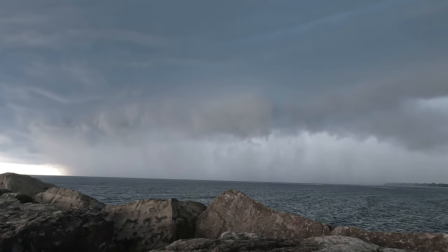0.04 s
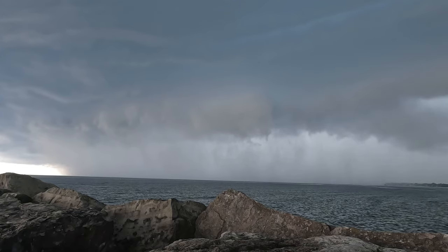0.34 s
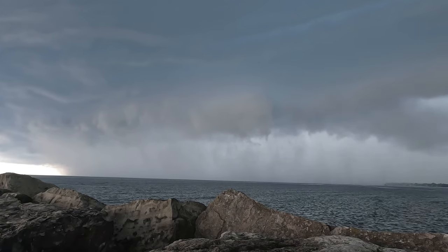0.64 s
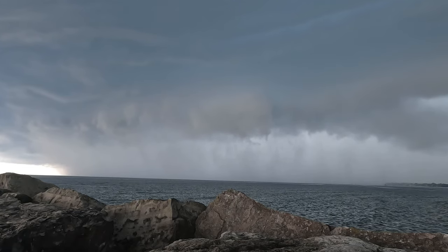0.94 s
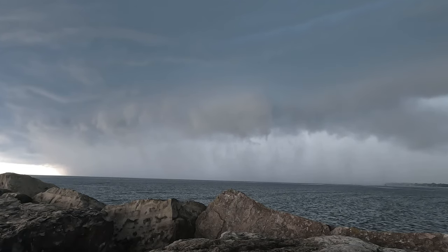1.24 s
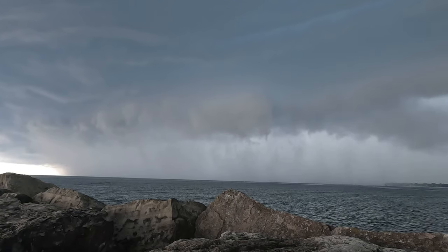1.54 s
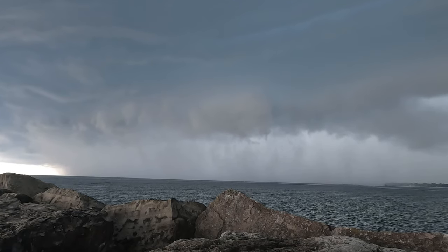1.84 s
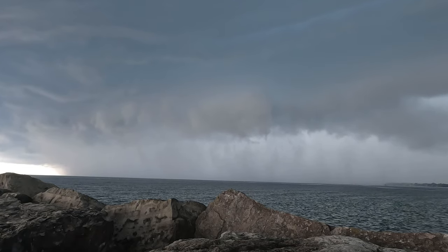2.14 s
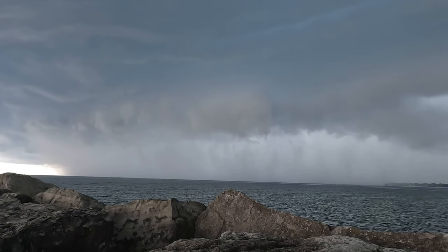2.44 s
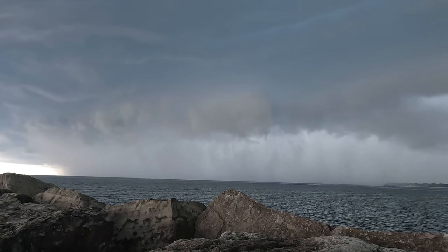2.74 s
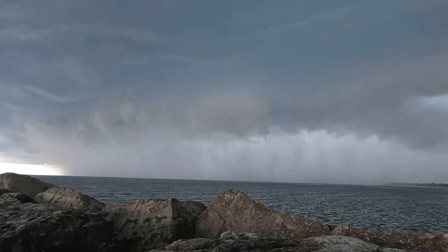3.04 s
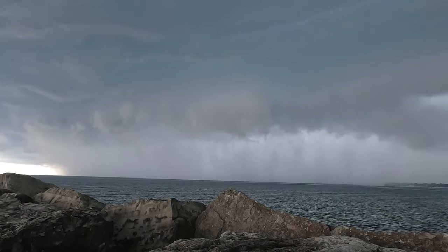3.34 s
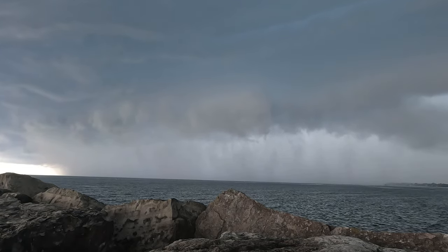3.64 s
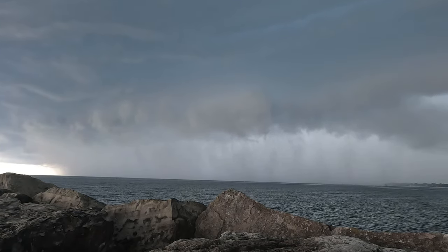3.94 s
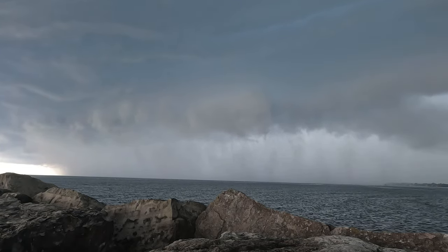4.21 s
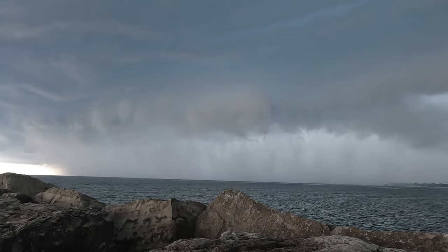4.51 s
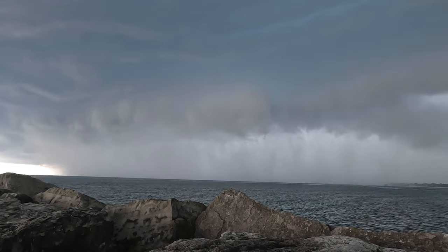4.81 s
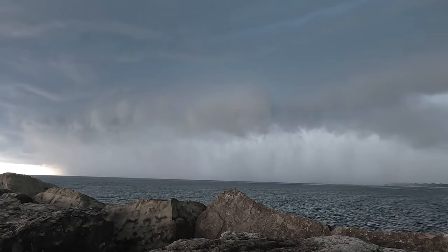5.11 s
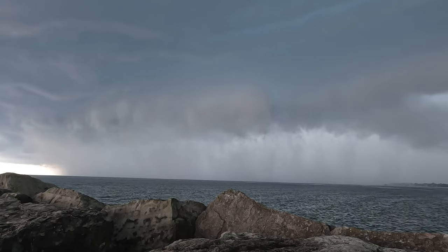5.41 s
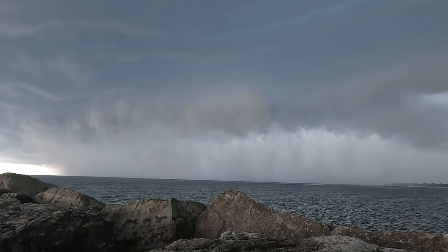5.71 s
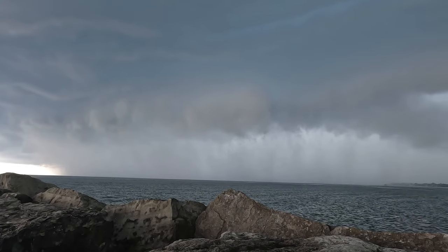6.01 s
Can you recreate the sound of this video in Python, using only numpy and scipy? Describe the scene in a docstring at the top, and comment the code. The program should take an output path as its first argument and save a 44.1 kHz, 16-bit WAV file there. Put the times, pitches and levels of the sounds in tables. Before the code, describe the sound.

A tearing crackle of thunder builds to heavy booms and a long rumble, with soft rain, water and wind along a rocky shore.

```python
"""Thunder over a rocky shore

A rain front approaches over open water. The lightning's thin branches arrive first as a tearing crackle,
then the main channel as heavy shock waves. Farther parts roll on, dulled by the air.
The boulders scatter it all, over low wind and the hiss of rain and water."""
import sys
import numpy as np
from scipy import signal
from scipy.fft import rfft, irfft
from scipy.io import wavfile
from scipy.ndimage import uniform_filter1d, minimum_filter1d

SR = 44100
rng = np.random.default_rng(int(sys.argv[2]) if len(sys.argv) > 2 else 0)


def store_wav(level_fs):
    """Save 16-bit WAV to argv[1]."""
    pcm = np.round(np.clip(np.atleast_2d(level_fs), -1, 1) * 32767)
    wavfile.write(sys.argv[1], SR, pcm.T.astype(np.int16))


N = 275977
TIME = np.arange(N) / SR
TREBLE_LIMIT_HZ = 15200

# shock waves of the main channel: start_s, level_db, pitch_hz, knock_db (relative to level_db), front_db
MAIN_SHOCKS = [(0.545, -7, 203, -20, -46), (1.412, -15, 336, 3.5, -29), (1.552, -11, 258, -15, -32),
               (1.662, -9, 257, -9, -29), (1.673, -8, 252, -15, -33), (1.865, -2, 211, -15, -19),
               (1.875, -11.5, 300, 6, -15), (1.893, 3, 242, -9.5, -10), (1.934, 1, 199, -17, -28),
               (1.9388, -1, 234, -3, 1), (1.951, -7, 269, 0, -11), (1.962, -8, 232, -7, -10),
               (1.972, -4.5, 305, 0.5, -9), (1.992, -5, 249, -2.5, -10), (2.039, -2.5, 220, -7, -5.5),
               (2.063, -7, 248, -9, -27), (2.068, -4, 285, -7, -6), (2.177, -6.5, 330, -11, -10.5),
               (2.227, -17.5, 300, 3, -17.5), (2.269, -4.5, 314, -5.5, -5), (2.2755, -5, 323, -8.5, -6),
               (2.412, -11, 317, -6, -32), (2.464, -4.5, 273, -16.5, -15.5), (2.48, -7, 277, -10, -16),
               (2.489, -3, 200, -8, -10.5), (2.497, -3.5, 211, -10, -15.5), (2.577, -1.5, 237, -7, -6),
               (2.637, -7, 246, -12, -19), (2.659, -3.5, 216, -2, -19), (2.675, -1.5, 278, -15, -10.5),
               (2.698, -4.5, 230, -18, -10.5), (2.775, -18.5, 290, -8, -30), (3.2, -13, 270, -21, -41.5),
               (3.348, -12.5, 340, -7, -38), (3.423, -15, 330, -3.5, -37), (3.584, -20, 370, -3, -40),
               (3.664, -17.5, 338, -11, -44), (3.703, -4, 223, -14, -26), (3.717, -1.5, 175, -8, -21.5),
               (3.732, -14.5, 260, -6, -38), (3.862, -16.5, 253, -10.5, -45), (3.93, -15.5, 268, -9.5, -40),
               (3.982, -11.5, 318, -6.5, -30.5), (4.002, -11, 169, -11, -44),
               (4.056, -14.5, 283, -7.5, -32.5), (4.224, -11, 220, -17, -45), (4.27, -11, 236, -17, -43),
               (4.998, -10, 186, -5.5, -39), (5.006, -11.5, 330, -8, -46), (6.059, -7, 155, -18, -45),
               (6.094, -11.5, 167, -12, -43), (6.117, -9, 201, -8.5, -42)]
# tone of the crackle, snaps and sprays: frequency_hz, relative_db
CRACKLE_EQ = [(100, -19.5), (300, -1), (600, 3), (1000, -2.5), (1350, -7), (1700, -4), (2500, -4),
              (3800, -7.5), (5200, -12.5), (6800, -29), (8200, -44), (9300, -60.5), (14000, -78.5)]


def amp(db):
    """Decibels to gain."""
    return 10 ** (np.asarray(db) / 20)


def unit_rms(x):
    """Scales to an rms of one."""
    return x / np.sqrt(np.mean(x ** 2) + 1e-20)


def fader(curve):
    """Gain at every sample from rows of time_s, level_db."""
    return amp(np.interp(TIME, *np.transpose(curve)))


def add(mix, start_s, sound):
    """Mixes a sound in at start_s."""
    part = mix[max(round(start_s * SR), 0):][:len(sound)]
    part += sound[:len(part)]


def band(x, hz, width_hz):
    """One resonance with a peak gain of one."""
    return signal.lfilter(*signal.iirpeak(hz, hz / width_hz, SR), x)


def equalise(x, curve, size=4096):
    """Minimum-phase EQ of unit energy, so that attacks stay sharp."""
    hz, db = np.transpose(curve)
    bin_hz = abs(np.fft.fftfreq(size, 1 / SR))
    log_gain = np.log(amp(np.interp(np.log(bin_hz + 1), np.log(hz), db)))
    response = np.exp(signal.hilbert(log_gain).conj())
    taps = np.fft.ifft(response).real[:size // 2] * np.hanning(size)[size // 2:]
    return signal.oaconvolve(x, taps / np.linalg.norm(taps))[:len(x)]


def drift(rate_hz):
    """Smooth random modulation of rms one, rolling off above rate_hz."""
    smoothing = np.exp(-(np.fft.rfftfreq(N, 1 / SR) / rate_hz) ** 2)
    return unit_rms(irfft(rfft(rng.standard_normal(N)) * smoothing, N))


def shocks(per_s, spread_db):
    """Randomly timed clicks of uneven strength."""
    strength = amp(spread_db * np.minimum(rng.exponential(1, N), 4))
    return unit_rms(strength * rng.choice([-1, 1], N) * (rng.random(N) < per_s / SR))


def scatter(decay_s, per_s, size=8192):
    """A dying cluster of echoes with unit energy."""
    t = TIME[:size]
    echoes = rng.standard_normal(size) * (rng.random(size) < per_s / SR)
    taps = echoes * np.exp(-t / decay_s) * (1 - np.exp(-t * per_s / 2))
    return taps / (np.linalg.norm(taps) + 1e-9)


def echoed(pulse, echo_db, decay_s, per_s):
    """A pulse followed by its own cluster of echoes."""
    path = amp(echo_db) * scatter(decay_s, per_s)
    path[0] += 1
    return signal.fftconvolve(path, pulse)


def pressure_wave(hz, rise_cycles, size=4096, softness=1.72):
    """A shock rounded by distance: push, suction and a small rebound."""
    cycles = TIME[:size] * hz
    envelope = (cycles / rise_cycles * np.exp(1 - cycles / rise_cycles)) ** softness
    return np.sin(2 * np.pi * cycles) * envelope


def through_air(x, tilt_db_per_s, at_hz, patchy_db):
    """Later sound has come farther: duller, at a held level. Crossing paths shift its colour."""
    hz, t, spectrum = signal.stft(x, SR, nperseg=512)
    patches = uniform_filter1d(rng.standard_normal(spectrum.shape), size=6, axis=0)
    patches = unit_rms(uniform_filter1d(patches, size=10, axis=1))
    loss_db = tilt_db_per_s * t * np.minimum(hz[:, None] / at_hz, 1.3) ** 1.29
    gain = amp(patchy_db * patches - loss_db)
    gain /= np.sqrt(np.average(gain ** 2, axis=0, weights=np.mean(abs(spectrum) ** 2, 1)))
    return signal.istft(spectrum * gain, SR, nperseg=512)[1][:N]


def shore(wind_db=7, gust_db=2, fizz_hz=6800, fizz_full_db=-51):
    """Fine patter of rain and small waves, its fizz dying in the lulls; low wind swells along with it."""
    # a breeze stirs the rain and water: time_s, level_db
    breeze = [(0, -51.5), (3, -55.5), (3.6, -56.5), (4.9, -53.5), (5.4, -53.5), (5.56, -50.5), (5.7, -51.5),
              (5.85, -51), (6.26, -54.5)]
    # tone of the rain and water: frequency_hz, relative_db
    patter_eq = [(100, -3), (500, 5), (1000, 5), (1600, -1.5), (2700, -1.5), (4000, -8.5), (6000, -16.5),
                 (7600, -20.5), (9000, -33.5), (12000, -41), (14000, -65.5)]
    # tone of the wind: frequency_hz, relative_db
    wind_eq = [(10, -21.5), (25, -16.5), (45, -6), (80, -1), (150, -11), (400, -35.5), (1500, -66.5)]
    swell = fader(breeze)
    patter = unit_rms(equalise(shocks(per_s=9000, spread_db=-0.5), patter_eq))
    dull = signal.sosfiltfilt(signal.butter(4, fizz_hz, fs=SR, output="sos"), patter)
    fizz = (patter - dull) * (swell / amp(fizz_full_db)) ** 2
    wind = unit_rms(equalise(rng.standard_normal(N), wind_eq)) * amp(gust_db * drift(rate_hz=1.4))
    return swell * (dull + fizz + amp(wind_db) * wind)


def swells(far_storm_db=-36, bed_rise_s=0.0066, arch_skew=0.64, arch_sharpness=0.41):
    """Envelopes of the rumble and the crackle: fading beds and arched surges add up in power."""
    # the branches, then the main channel, each leave a long bed:
    # start_s, rumble_db, rumble_fade_db_per_s, crackle_db, crackle_fade_db_per_s
    beds = [(0.225, -32, 3.5, -32, 2.5), (1.865, -28, 0.08, -48.5, 6.5)]
    # swells of rumble and crackle: thunder peals and, near 5.5 and 5.8 s, probably small waves
    # lapping on the rocks: start_s, length_s, rumble_db, crackle_db
    surges = [(0.346, 0.088, -25, -26.5), (0.424, 0.15, -19, -20.5), (0.57, 0.087, -23.5, -23),
              (0.63, 0.094, -29.5, -35), (0.777, 0.21, -34, -28.5), (0.984, 0.055, -36, -25),
              (1.163, 0.083, -31, -29.5), (1.256, 0.15, -26, -30), (1.402, 0.2, -34.5, -33.5),
              (1.626, 0.25, -23, -27.5), (1.864, 0.26, -18.5, -41), (2.034, 0.16, -22, -39.5),
              (2.162, 0.066, -22, -28.5), (2.292, 0.21, -24.5, -37), (2.46, 0.22, -21, -30.5),
              (2.617, 0.11, -14.5, -31.5), (2.726, 0.099, -27.5, -56), (2.946, 0.11, -26.5, -31),
              (3.133, 0.074, -47.5, -37), (3.721, 0.13, -24, -54), (3.991, 0.16, -24, -35),
              (4.057, 0.28, -24.5, -35.5), (4.27, 0.52, -31, -38.5), (4.572, 0.061, -30.5, -38.5),
              (5.497, 0.14, -30, -35.5), (5.794, 0.1, -39, -38), (6.057, 0.1, -31.5, -61)]
    power = np.zeros((2, N))
    power[0] = amp(far_storm_db) ** 2  # the distant storm never falls quiet
    for start_s, rumble_db, rumble_fade, crackle_db, crackle_fade in beds:
        age = np.maximum(TIME - start_s, 0)
        attack = np.minimum(age / bed_rise_s, 1)
        power += (attack * amp([rumble_db - rumble_fade * age, crackle_db - crackle_fade * age])) ** 2
    for start_s, length_s, rumble_db, crackle_db in surges:
        progress = np.arange(0, length_s, 1 / SR) / length_s
        arch = np.sin(np.pi * progress ** arch_skew) ** arch_sharpness
        add(power[0], start_s, (amp(rumble_db) * arch) ** 2)
        add(power[1], start_s, (amp(crackle_db) * arch) ** 2)
    return np.sqrt(power)


def roll(swell, lump_db=1.2):
    """Overlapping dull shocks from far along the channel and from echoes, growing deeper with time."""
    # tone of the rumble: frequency_hz, relative_db
    rumble_eq = [(20, -34.5), (45, -30.5), (90, -15), (145, -0.5), (230, -2), (380, -8), (470, -9.5),
                 (620, -13.5), (900, -22.5), (1500, -33.5), (3000, -49), (6000, -95)]
    lumps = shocks(per_s=3000, spread_db=1.0) * amp(lump_db * drift(rate_hz=45))
    rumble = through_air(equalise(lumps, rumble_eq), tilt_db_per_s=0.94, at_hz=515, patchy_db=-0.5)
    return swell * unit_rms(rumble)


def boulders(x):
    """Hollows among the rocks ring briefly with every blow."""
    # resonances of the hollows: pitch_hz, width_hz, level_db
    hollows = [(349.4, 47.4, 0), (567, 23, -8), (840, 11, -11.5)]
    return x + sum(amp(db) * band(x, hz, width_hz) for hz, width_hz, db in hollows)


def snaps(snap_db=1.0, ring_db=4.0, thud_db=-7, thud_hz=230):
    """Larger kinks in the branches: a bright spray of shocks, coloured by their spacing, and a thud."""
    # snaps of single branches: start_s, level_db, pitch_hz, decay_s
    branches = [(0.2057, -17.5, 5170, 0.021), (0.227, -12, 2140, .005), (0.236, -9.5, 1240, 0.014),
                (0.2729, -14, 4800, 0.0061), (0.2836, -17.5, 1094, 0.02), (0.3227, -11, 1040, 0.0089),
                (0.349, -14, 2160, 0.018), (0.413, -11, 2510, 0.012), (0.439, -10.5, 1320, 0.061),
                (0.483, -13.5, 4150, 0.006), (0.503, -18.5, 1110, 0.0094), (0.5211, -3.5, 5050, 0.0066),
                (0.573, -14, 1900, 0.01), (0.605, -12, 1660, 0.0022), (0.628, -12.5, 1430, 0.015),
                (0.67, -24, 1520, 0.0033), (0.717, -14, 2860, 0.025), (0.793, -19, 1540, 0.0077),
                (0.8565, -10, 1950, 0.011), (0.868, -12, 2200, 0.0041), (0.909, -7.5, 2490, 0.028),
                (0.944, -14.5, 2400, 0.013), (0.9917, -9.5, 2330, 0.013), (1.022, -19, 2300, 0.0083),
                (1.1626, -17, 980, 0.018), (1.176, -11.5, 3260, 0.012), (1.2195, -22, 2430, .005),
                (1.2993, -16.5, 1450, 0.003), (1.3255, -10, 1610, 0.022), (1.406, -16.5, 920, 0.016),
                (1.558, -8, 1970, 0.037), (1.617, -12, 1920, 0.019), (1.638, -11.5, 1450, 0.0096),
                (1.662, -6.5, 2000, 0.058), (1.7103, -5, 1400, 0.0049), (1.724, -11, 1286, .007),
                (1.772, -6.5, 1240, 0.0081), (1.787, -10, 1220, 0.013)]
    bright, thuds = np.zeros(N), np.zeros(N)
    thud = pressure_wave(thud_hz, rise_cycles=0.28)
    for start_s, db, hz, decay_s in branches:
        attack = amp(1) * echoed([1], echo_db=-1.0, decay_s=0.002, per_s=4200)
        spray = attack + amp(7.5) * scatter(decay_s, per_s=2600)
        add(bright, start_s, amp(db) * (spray + amp(ring_db) * band(spray, hz, width_hz=850)))
        add(thuds, start_s, amp(db) * echoed(thud, echo_db=-4.5, decay_s=0.01, per_s=310))
    bright = through_air(equalise(bright, CRACKLE_EQ), tilt_db_per_s=6.5, at_hz=4330, patchy_db=1.5)
    return amp(snap_db) * bright + amp(thud_db) * thuds


def tearing(swell, gain_db=-1, clump_db=2.5, blur_s=2.2):
    """Thousands of tiny shocks from the branches' kinks: gritty clumps, later blurred by distance."""
    # longer kinks give the tearing a hard midrange: time_s, emphasis_db
    bark = [(0.2, 4), (1.0, -1), (1.55, -3.5), (1.66, 10.5), (1.79, 5.5), (1.86, 5.5), (2.7, 4.5),
            (3.4, -1), (4.07, 2.5), (4.3, -1), (5.55, -2.5)]
    nearness = np.exp(-TIME / blur_s)
    grit = unit_rms(shocks(per_s=2200, spread_db=4.0) * amp(clump_db * drift(rate_hz=100)))
    blur = shocks(per_s=6000, spread_db=1.0)
    crackle = nearness * grit + np.sqrt(1 - nearness ** 2) * blur
    crackle = through_air(equalise(crackle, CRACKLE_EQ), tilt_db_per_s=7.0, at_hz=4000, patchy_db=2.0)
    midrange = (fader(bark) - 0.5) * band(crackle, hz=1270, width_hz=750)
    return amp(gain_db) * swell * unit_rms(crackle + midrange)


def booms(gain_db=-1.0, knock_hz=520, high_cut_hz=820):
    """Each bend of the main channel sends a heavy wave; its steep flank knocks among the rocks."""
    body = np.zeros(N)
    knock = pressure_wave(knock_hz, rise_cycles=0.47)
    for start_s, db, hz, knock_db, _ in MAIN_SHOCKS:
        wave = pressure_wave(hz, rise_cycles=0.68)
        add(body, start_s, amp(db) * echoed(wave, echo_db=-5.5, decay_s=0.016, per_s=890))
        add(body, start_s, amp(db + knock_db) * echoed(knock, echo_db=-1.0, decay_s=0.025, per_s=1400))
    return amp(gain_db) * signal.lfilter(*signal.butter(4, high_cut_hz, fs=SR), body)


def cracks(gain_db=-0.5, spray_s=0.013, steep_hz=13000, db_per_octave=13):
    """Each boom's steep front, its bounces off the nearest rocks, and a duller spray from the others."""
    # tone of the shock front: frequency_hz, relative_db
    front_eq = [(150, -28.5), (600, 4), (2000, 13), (4000, -2), (6000, -7), (7200, -7), (8300, -16),
                (9300, -22), (12000, -22), (15000, -35.5)]
    front, spray = np.zeros(N), np.zeros(N)
    for start_s, *_, db in MAIN_SHOCKS:
        top_hz = min(steep_hz * 2 ** (db / db_per_octave), TREBLE_LIMIT_HZ)  # stronger stays steeper
        bounces = echoed([1], echo_db=-1, decay_s=0.002, per_s=6000)
        bounces += amp(-8) * scatter(spray_s, per_s=2800)
        add(front, start_s, amp(db) * signal.lfilter(*signal.butter(4, top_hz, fs=SR), bounces))
        add(spray, start_s, amp(db) * scatter(spray_s, per_s=1200))
    return amp(gain_db) * (equalise(front, front_eq) + equalise(spray, CRACKLE_EQ))


def spits(width_hz=1400, rise_s=0.0031):
    """Brief narrow fizzes where small waves meet the rocks."""
    # water spitting on the rocks: start_s, level_db, pitch_hz
    splashes = [(3.141, -54, 3500), (3.596, -58.5, 4830)]
    mix, t = np.zeros(N), TIME[:4096]
    envelope = t / rise_s * np.exp(1 - t / rise_s)
    for start_s, db, hz in splashes:
        noise = rng.standard_normal(len(t))
        fizz = unit_rms(band(band(noise, hz, width_hz), hz, width_hz))
        add(mix, start_s, amp(db) * fizz * envelope)
    return mix


def scene(low_cut_hz=75):
    """Mono mix: thunder among the rocks, its deepest bass trimmed, over the shore."""
    rumble_swell, crackle_swell = swells()
    thunder = boulders(tearing(crackle_swell) + snaps() + booms() + cracks() + roll(rumble_swell))
    thunder = signal.sosfilt(signal.butter(1, low_cut_hz, "high", fs=SR, output="sos"), thunder)
    return (thunder + shore() + spits())[None]


def record(dry, ceiling=0.9, window_samples=130):
    """A steep high cut, then a quick limiter that holds the heaviest waves under full scale."""
    high_cut = signal.firwin(511, TREBLE_LIMIT_HZ, window=("kaiser", 9), fs=SR)
    x = signal.oaconvolve(dry, high_cut[None], "same")
    allowed_gain = 1 / np.maximum(abs(x) / ceiling, 1)
    return x * uniform_filter1d(minimum_filter1d(allowed_gain, window_samples), window_samples)


dry = scene()
out = record(dry)
store_wav(out)
```